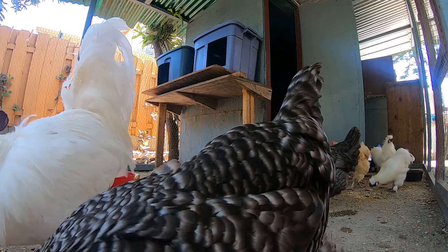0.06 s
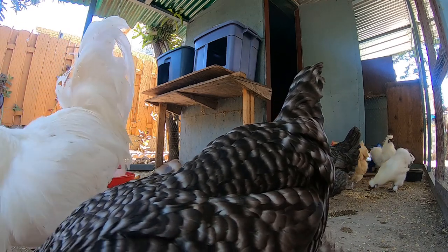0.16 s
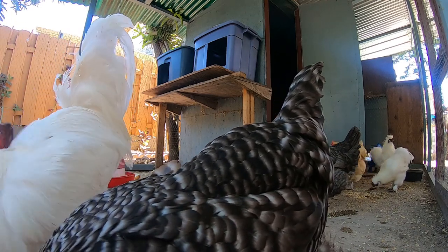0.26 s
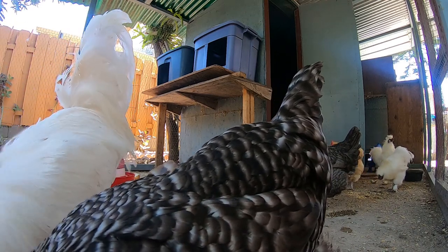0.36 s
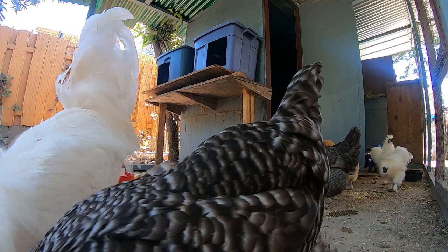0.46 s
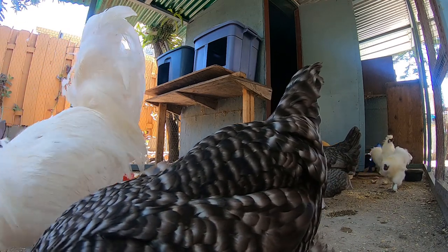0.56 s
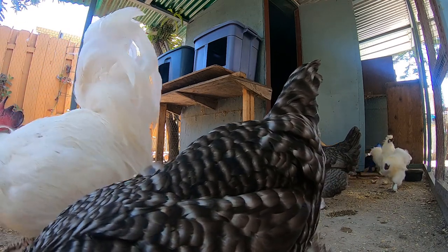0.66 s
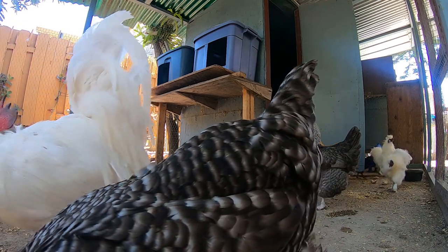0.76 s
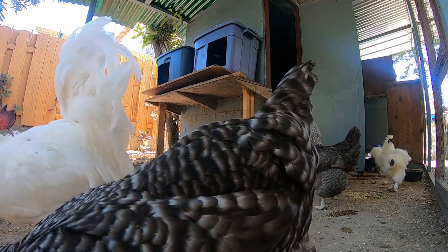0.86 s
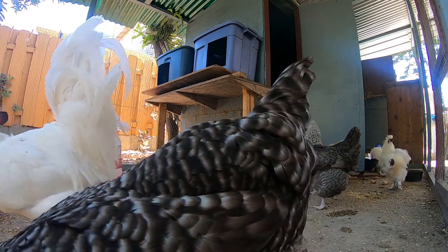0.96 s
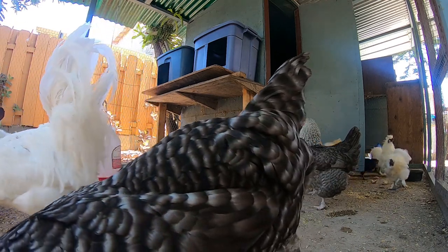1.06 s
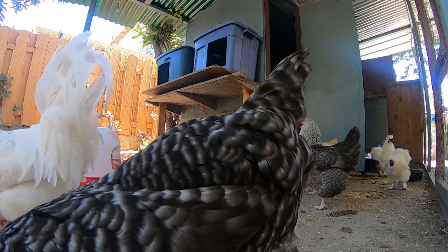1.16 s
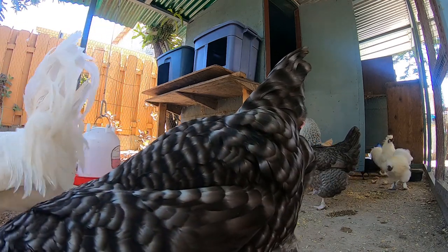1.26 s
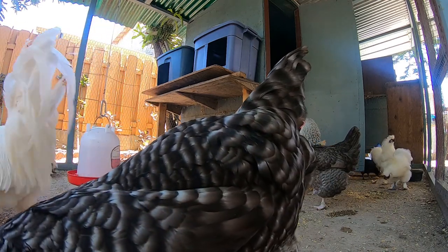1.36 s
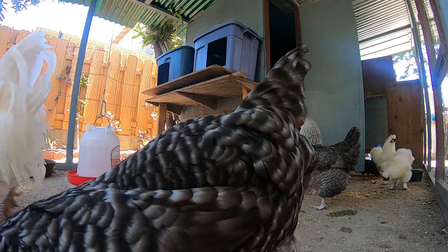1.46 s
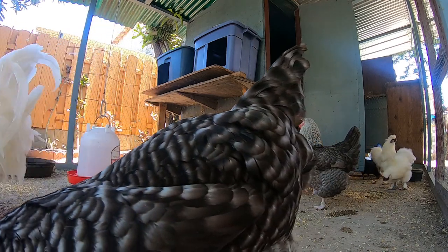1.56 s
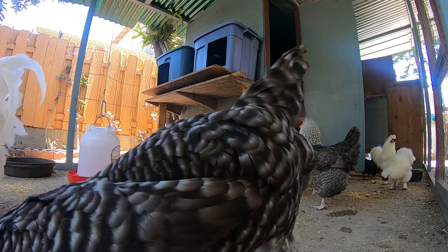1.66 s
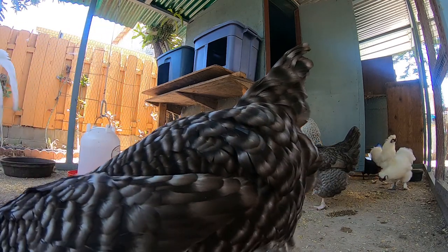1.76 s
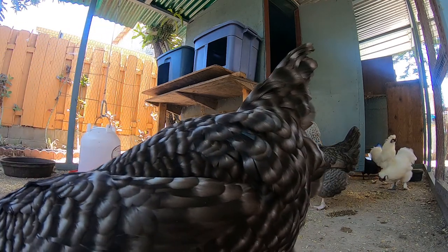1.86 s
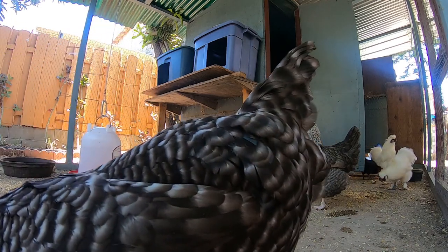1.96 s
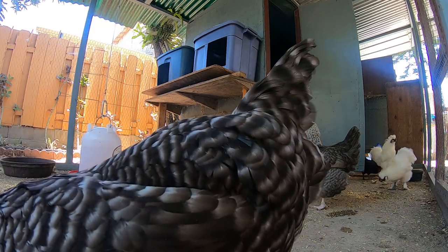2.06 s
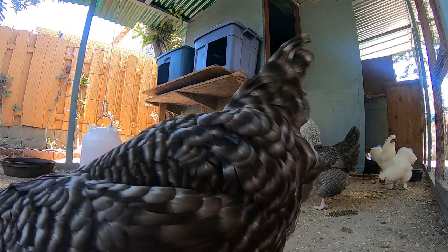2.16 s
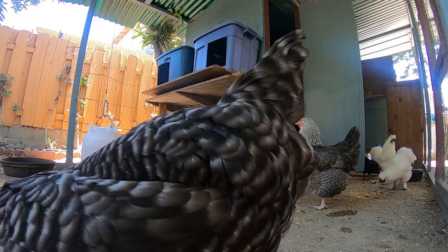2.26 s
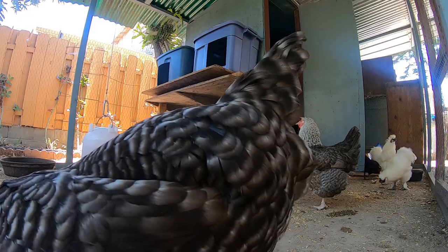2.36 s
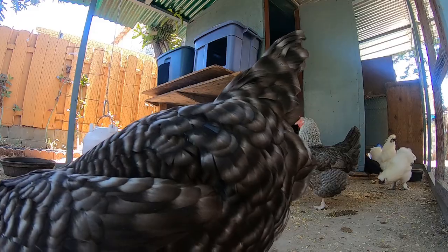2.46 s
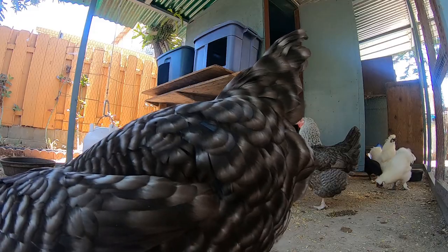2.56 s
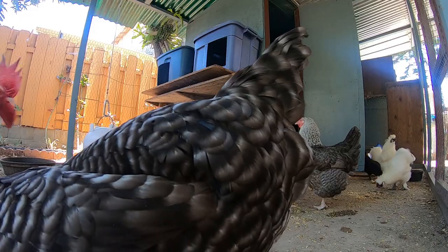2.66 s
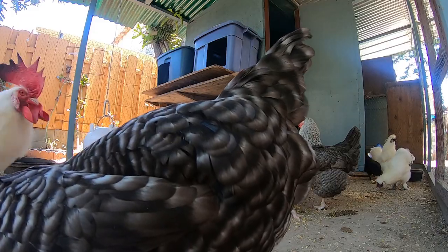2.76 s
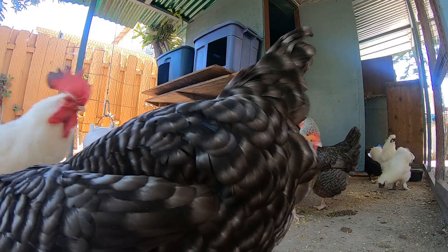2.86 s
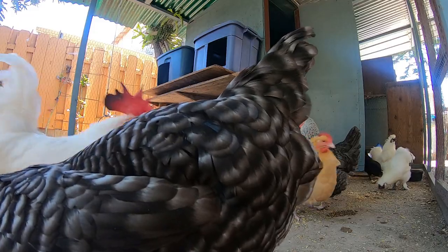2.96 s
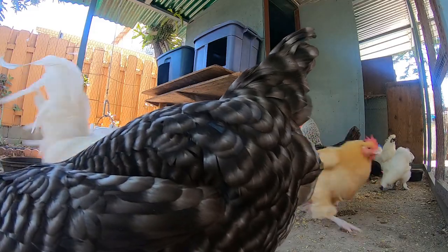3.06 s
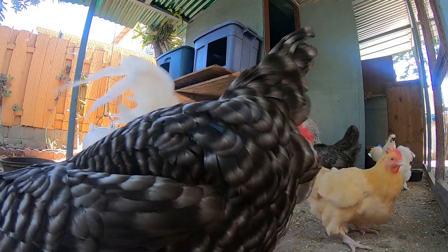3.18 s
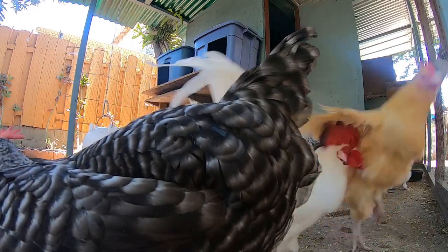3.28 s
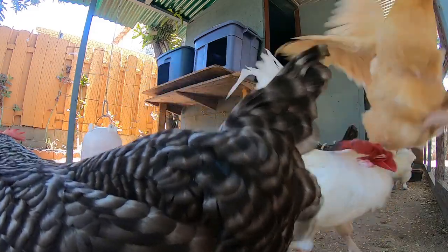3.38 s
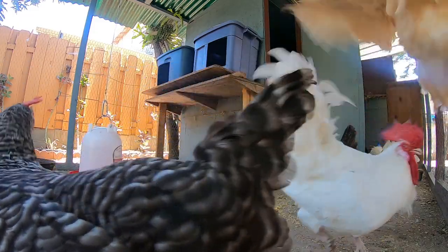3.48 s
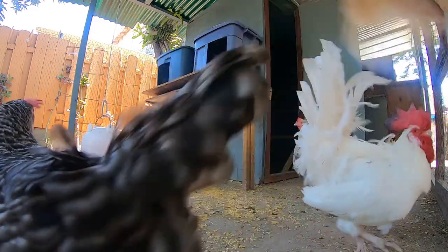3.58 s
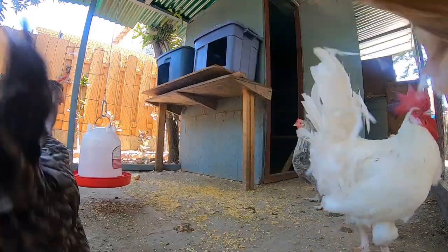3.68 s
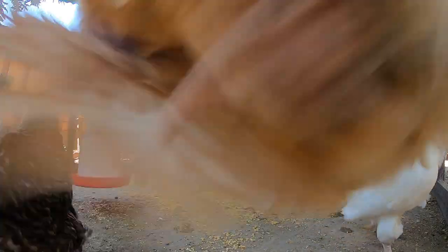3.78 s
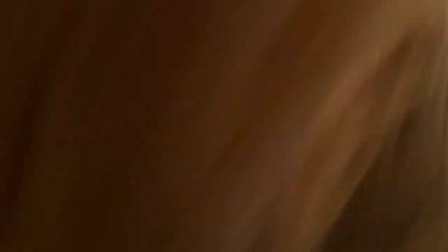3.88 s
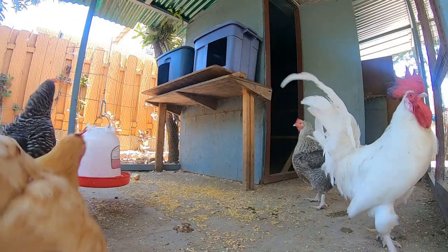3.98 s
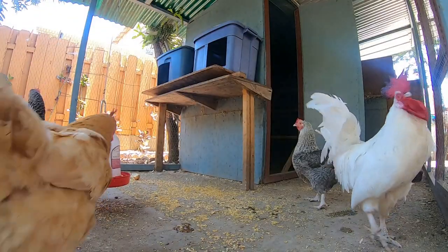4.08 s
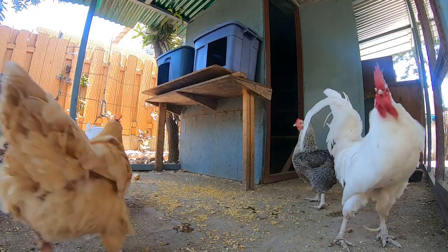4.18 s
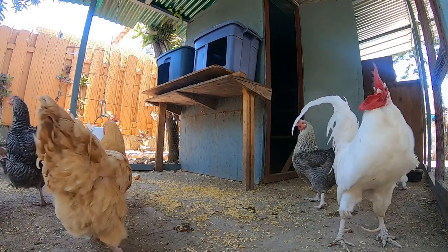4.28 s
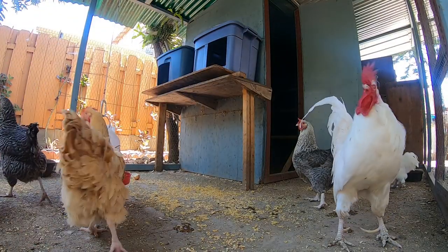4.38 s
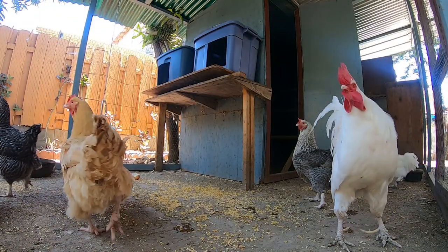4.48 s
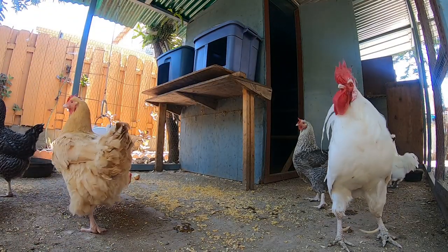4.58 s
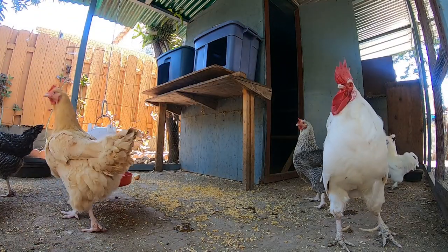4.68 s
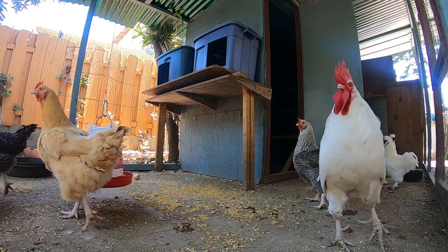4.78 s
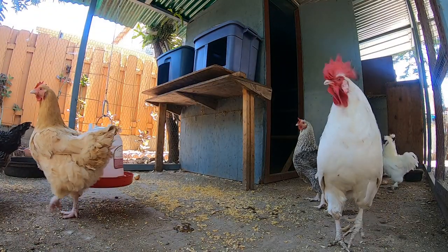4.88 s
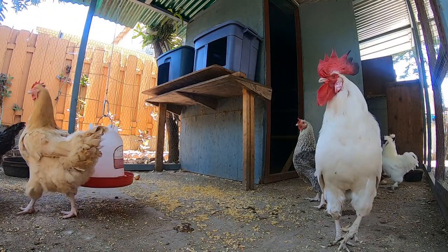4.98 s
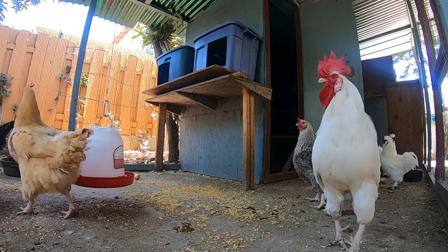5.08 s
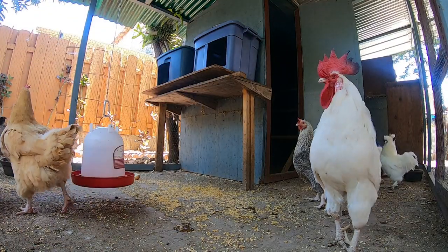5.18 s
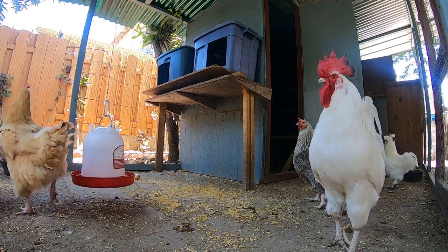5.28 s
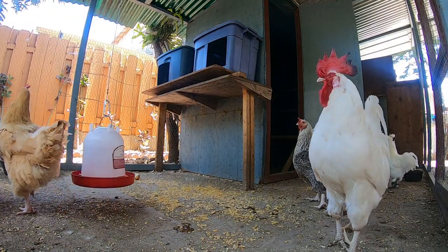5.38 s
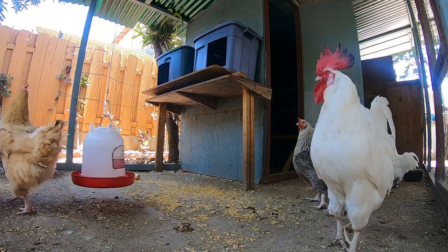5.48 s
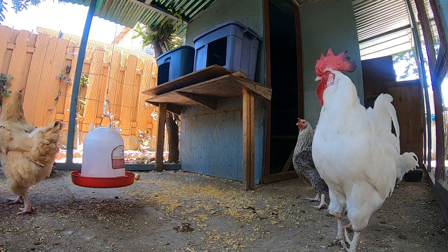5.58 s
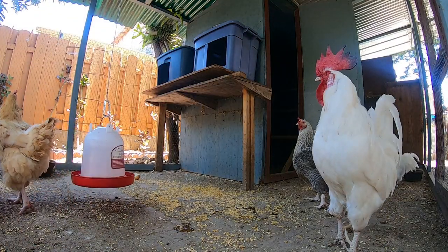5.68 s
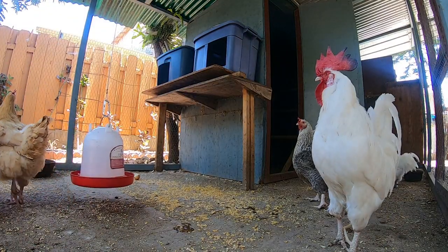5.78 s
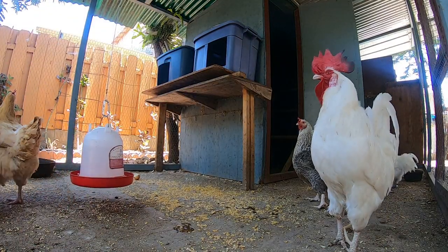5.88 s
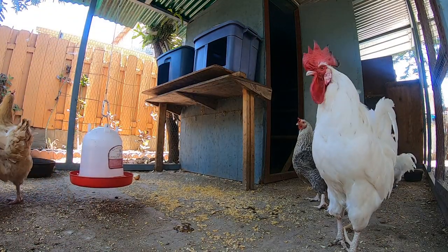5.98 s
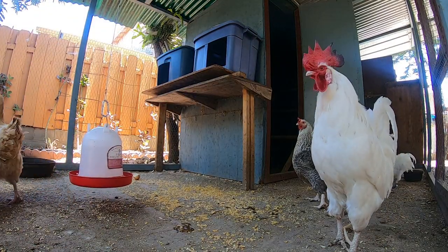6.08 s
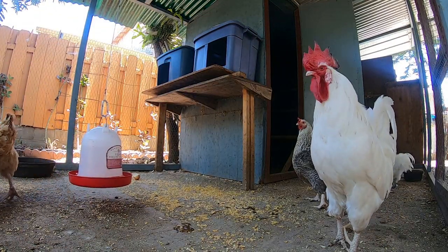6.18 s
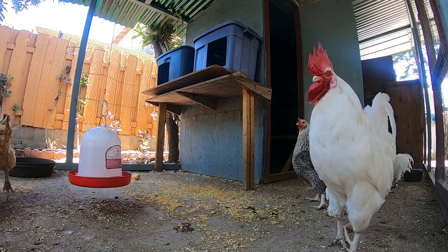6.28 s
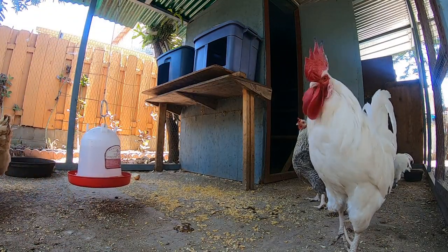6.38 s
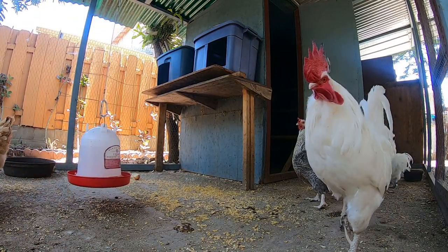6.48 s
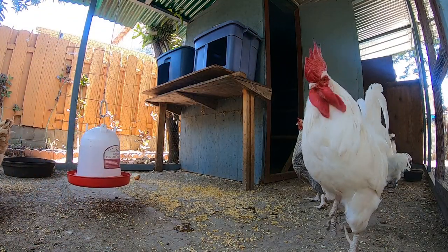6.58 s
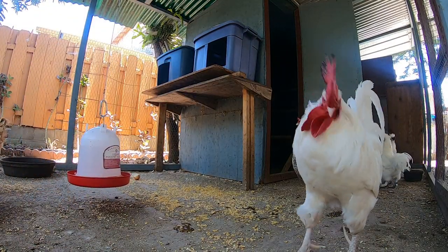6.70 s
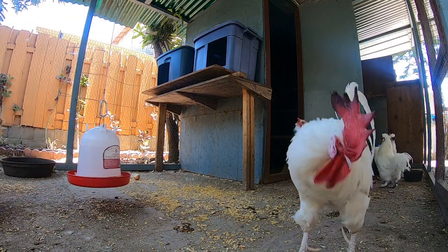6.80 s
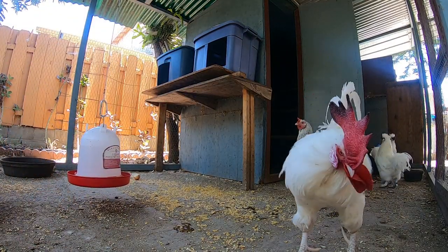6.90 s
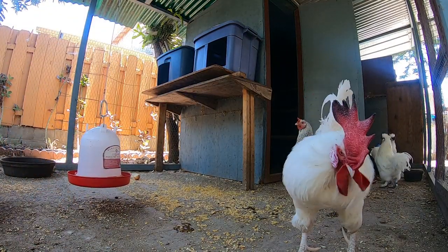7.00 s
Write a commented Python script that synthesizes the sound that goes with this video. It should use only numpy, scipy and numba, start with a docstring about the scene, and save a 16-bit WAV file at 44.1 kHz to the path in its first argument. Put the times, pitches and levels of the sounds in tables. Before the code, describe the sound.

Quiet pecking, feather rustles and a scrape on the microphone lead to frantic hen squawks, buffeting flaps, a falling whine and two hoarse rooster calls.

```python
"""Birds rustle, peck and peep in a roofed run, heard from a camera on the ground; one scuffs against it.
A chased hen yelps, squawks four times and flaps over the microphone, then clucks softly and whines, falling.
A rooster answers close by with two rising, rasping calls over a low outdoor rumble. Voices are pulses or
sines, most shaped by throat resonances; air, feathers and grit are filtered noise; struck things ring or click."""
import sys
import numpy as np
from scipy import signal
from scipy.fft import rfft, irfft, next_fast_len
from scipy.io import wavfile
from scipy.ndimage import uniform_filter1d
from numba import njit

SR = 44100
rng = np.random.default_rng(int(sys.argv[2]) if len(sys.argv) > 2 else 0)


def generate_wav(signal):
    """Clip the signal to [-1, 1] and save it as 16-bit WAV at the path in sys.argv[1]."""
    frames = np.transpose(np.atleast_2d(signal))
    scaled = np.clip(frames, -1, 1) * 32767
    pcm = np.round(scaled).astype(np.int16)
    wavfile.write(sys.argv[1], SR, pcm)


N = 310464
TIME = np.arange(N) / SR

# wing strokes that reach the microphone:
# (time [s], air push [dB], buffeting [dB], feather swish [dB], swish decay [s])
WING_STROKES = [(3.4, -19.5, -36, -20.5, 0.027), (3.528, -14.5, -32, -33.5, 0.082),
                (3.637, -4.5, -42, -29.5, 0.041), (3.755, -16, -8.5, -31.5, 0.002),
                (3.786, -11.5, -21, -64, .005), (3.873, -16, -28, -40, 0.013),
                (3.957, -26, -16.5, -46.5, 0.054), (3.997, -29, -9, -36, 0.0085)]


def undb(db):
    """Decibels to gain."""
    return 10 ** (np.asarray(db) / 20)


def unit(x):
    """Scale to rms 1."""
    return x / np.sqrt(np.mean(x ** 2) + 1e-18)


def even(x, size=900):
    """Hold the running rms near 1 over about size samples, so that a level curve sets the loudness."""
    power = uniform_filter1d(uniform_filter1d(x ** 2, size), size // 2)
    return x / np.sqrt(np.abs(power) + 1e-12)


def curves(rows, t):
    """Every column of a table at times t."""
    s, *columns = np.transpose(rows)
    return [np.interp(t, s, c) for c in columns]


def span(start, end):
    """Sample times from start to end."""
    return TIME[int(start * SR):int(end * SR)]


def hold(t, start, end, attack, release):
    """Envelope that has risen to 1 by start, holds until end and then falls to 0."""
    return np.clip(1 + np.minimum((t - start) / attack, (end - t) / release), 0, 1)


def flare(s, rise, decay):
    """Envelope that swells to 1 at time s and dies away."""
    return np.exp(-np.minimum(np.maximum((s - TIME) / rise, (TIME - s) / decay), 20))


def add(out, s, x, pan_db=0):
    """Mix a sound into the stereo track at time s; pan_db is left minus right, so negative is to the right."""
    i = max(int(s * SR), 0)
    sides = undb(np.array([[pan_db], [-pan_db]]) / 2)
    x = (x * sides / sides.mean())[:, :N - i]
    out[:, i:i + x.shape[1]] += x


def walk(n, rate):
    """Smooth random wander, spread near 1."""
    k = max(int(SR / rate), 2)
    steps = np.repeat(rng.standard_normal(n // k + 2), k)
    return 1.302 * uniform_filter1d(uniform_filter1d(steps, k), k)[:n]


def colour(x, points):
    """Filter by a spectrum of (frequency [Hz], level [dB]) points."""
    n = x.shape[-1]
    size = next_fast_len(n + 2048)
    hz, db = np.transpose(points)
    bins_hz = np.arange(size // 2 + 1) * SR / size
    gain = undb(np.interp(np.log(bins_hz + 1), np.log(hz), db))
    return irfft(rfft(x, size) * gain, size)[..., :n]


def pair(n, likeness):
    """Left and right noise with the given correlation; the centre has rms 1."""
    c = np.clip(likeness, 0, 1)
    mid, side = rng.standard_normal((2, n))
    return mid + np.sqrt((1 - c) / (1 + c)) * side * np.array([[1], [-1]])


def band(x, lo_hz, hi_hz):
    """Causal band-pass."""
    edges_hz = [lo_hz, min(hi_hz, .45 * SR)]
    return signal.sosfilt(signal.butter(2, edges_hz, "band", fs=SR, output="sos"), x)


@njit
def svf(x, hz, width):
    """Moving resonance, gain 1 at its centre."""
    y, b, l = np.empty(len(x)), 0., 0.
    for i in range(len(x)):
        g, k = np.tan(np.pi * hz[i] / SR), width / hz[i]
        v = (b + g * (x[i] - l)) / (1 + g * (g + k))
        b, l, y[i] = 2 * v - b, l + 2 * g * v, k * v
    return y


def steep(x, hz, width_hz):
    """A resonance applied twice; the width is that of one pass."""
    return svf(svf(x, hz, float(width_hz)), hz, float(width_hz))


def resonate(x, hz, width_hz):
    """A steep throat resonance at steady loudness."""
    return even(steep(x, hz, width_hz))


def roughness(rows, t, clear, turn_s):
    """Roughness of a voice that is fairly clear except in the given stretches."""
    return np.maximum(clear, sum(r * hold(t, start, end, turn_s, turn_s) for start, end, r in rows))


def syrinx(hz, rough, jitter, shimmer, air):
    """Voice membrane pulses: roughness scatters their spacing and size, and air hisses once a cycle."""
    n = len(hz)
    phase = 2 * np.pi * np.cumsum(hz * (1 + jitter * rough * walk(n, 500))) / SR
    pulses = unit(sum(np.cos(k * phase) * (k * hz < SR / 3) for k in np.arange(1, 40)))
    hiss = rng.standard_normal(n) * (1 + np.cos(phase))
    return pulses * (1 + shimmer * rough * walk(n, 400)) + air * (rough + 0.25) * hiss


def coop(x):
    """Short diffuse echo from the shed wall, fence and tin roof: decaying noise, shorter in the treble."""
    t60_s, treble_t60_s = 0.25, 0.2  # time to die away by 60 dB
    t = TIME[:SR // 2]
    noise = pair(len(t), 0.58) * np.clip((t - .004) / 0.0031, 0, 1)
    body = band(noise, 220, 5200) * undb(-60 * t / t60_s)
    treble = band(noise, 3200, 9700) * undb(-60 * t / treble_t60_s)
    tail = body + 0.16 * treble
    return signal.fftconvolve(x.mean(0)[None], tail / np.sqrt(np.sum(tail ** 2)), axes=1)[:, :N]


def ports(common_db):
    """Rocking moves the two microphone ports in opposite directions, plus a part common to both."""
    return undb(common_db) + np.array([[1], [-1]])


def outdoors():
    """A wavering low rumble and a smooth distant wash: louder early on, sunk for a while after the wing beats."""
    # tone of each noise: (frequency [Hz], relative level [dB])
    rumble_tone = [(20, -8.5), (45, -9), (72, 5), (110, -7), (165, 5), (220, -3.5), (290, -5.5), (400, -24),
                   (700, -69), (5000, -100)]
    wash_tone = [(200, -20.5), (400, 3), (700, 0), (1500, -4.5), (2200, -13.5), (3500, -16.5),
                 (4800, -20.5), (6000, -28.5), (8500, -26.5), (15000, -64.5)]
    early = np.clip(1 - (TIME - 1.7) / 0.42, 0, 1)  # fades out from 1.7 s, over 0.42 s
    dip = hold(TIME, 4.223, 4.6, attack=0.15, release=0.95)
    low, far = pair(N, .94), pair(N, .4)
    rumble_db = -42 + 4 * early - 13.5 * dip + 2.66 * walk(N, 10)
    wash_db = -52 + 4.5 * early - 7.5 * dip + 0.31 * walk(N, 6.4)
    return unit(colour(low, rumble_tone)) * undb(rumble_db) + unit(colour(far, wash_tone)) * undb(wash_db)


def shuffles(rise_s=0.012, decay_s=0.017):
    """Feet drag briefly over grit and spilled feed: short swells of grainy noise."""
    # soft shuffles: (time [s], level [dB])
    drags = [(4.262, -53.5), (4.932, -52.5), (4.972, -57), (5.078, -56), (5.185, -57), (5.56, -49.5),
             (6.797, -49)]
    # tone of feet on dirt: (frequency [Hz], relative level [dB])
    dirt_tone = [(400, -22), (1300, 2), (4500, 3.5), (6000, -15), (9000, -13.5), (15000, -45)]
    grit = unit(colour(pair(N, .5) * undb(4 * walk(N, 700)), dirt_tone))
    return grit * sum(undb(db) * flare(s, rise_s, decay_s) for s, db in drags)


def peeps(room_db=-5):
    """Nearly pure gliding notes, each a swelling sine: distant peeps, and the hen's rising yelp at 3.165 s."""
    # distant peeps, and at 3.165 s the chased hen's yelp close by:
    # (time [s], length [s], start pitch [Hz], middle pitch [Hz], end pitch [Hz], level [dB])
    notes = [(0.08, 0.09, 3570, 3080, 2360, -56), (1.904, 0.11, 2200, 2810, 2380, -49),
             (1.919, 0.099, 2920, 3310, 3220, -47), (2.186, 0.084, 4100, 2840, 2290, -52),
             (3.165, 0.027, 980, 1154, 1610, -26.5)]
    out = np.zeros((2, N))
    for s, length_s, start_hz, middle_hz, end_hz, db in notes:
        u = np.linspace(0, 1, int(length_s * SR))
        glide_hz = np.interp(u, [0, .5, 1], [start_hz, middle_hz, end_hz])
        hz = glide_hz * (1 + 0.014 * walk(len(u), 356))
        add(out, s, np.sin(2 * np.pi * np.cumsum(hz) / SR) * np.sin(np.pi * u) * undb(db))
    return out + undb(room_db) * coop(out)


def taps(decay_s=0.0032, thud_decay_s=0.0066, room_db=-8, pan_db=2):
    """Pecks, steps and, from 3.649 to 3.98 s, wing strikes: a thud, a clack and a tick, all bursts of noise."""
    # pecks, steps and wing strikes; a harder one has less thud and more tick:
    # (time [s], level [dB], hardness [dB])
    strikes = [(0.0907, -33, -4.5), (1.367, -29.5, -12.5), (2.4978, -51, 17), (2.6124, -46, 10),
               (2.6343, -38, -11), (2.678, -46, 11), (2.7177, -38, 3), (2.937, -34.5, -4.5),
               (3.177, -29, 10.5), (3.2935, -23, -2), (3.649, -16.5, 7), (3.755, -29, -14),
               (3.8625, -20, 11), (3.9797, -19.5, 13.5), (6.4644, -36, 0), (6.6507, -36.5, 0.5),
               (6.7866, -32, 1)]
    thud_db, tick_db = -8, -11.5  # against the clack, at hardness 0
    out, t = np.zeros((2, N)), TIME[:SR // 20]
    for s, db, hard_db in strikes:
        noise = pair(len(t), 0.8)
        thud = unit(band(noise, 350, 900)) * np.exp(-t / thud_decay_s) * undb(thud_db - hard_db)
        clack = unit(band(noise, 630, 2960 * 2 ** (hard_db / 20)))
        tick = unit(band(noise, 7300, 8400)) * undb(tick_db + hard_db)
        crack = (clack + tick) * np.exp(-t / decay_s)
        add(out, s, band(thud + crack, 200, 8800) * undb(db), pan_db)
    return out + undb(room_db) * coop(out)


def knock(room_db=-3, crack_db=-10, rattle_db=-17, rattle_decay_s=.02):
    """One hard peck rings the feeder, which rattles briefly and fills the run."""
    # the peck: (time [s], level [dB])
    peck_s, peck_db = (2.0738, -14.5)
    # ringing tones of the feeder: (frequency [Hz], relative level [dB], time to fall 60 dB [s])
    feeder = [(607, 4, 0.0039), (880, -15, 0.015), (1580, 2.5, 0.019), (1800, 1.5, 0.019),
              (2700, -12, 0.018), (3020, -3.5, 0.018), (3190, -1.5, 0.026), (3500, -8, 0.026),
              (4500, -18, 0.022), (4700, -31, 0.034), (6470, -11, 0.016), (7960, -8, 0.014)]
    out, t = np.zeros((2, N)), TIME[:SR // 6]
    ring = sum(undb(db - 60 * t / t60) * np.sin(2 * np.pi * hz * t) * rng.choice([-1, 1])
               for hz, db, t60 in feeder)
    noise = pair(len(t), 0.086)
    crack = band(band(noise, 570, 8000), 430, 7900) * np.exp(-t / 0.00085)
    rattle = unit(band(noise, 810, 3800)) * np.exp(-t / rattle_decay_s)
    hit = ring / np.abs(ring).max() + undb(crack_db) * crack + undb(rattle_db) * rattle
    add(out, peck_s, band(hit, 150, 9000) * undb(peck_db), pan_db=4)
    return out + undb(room_db) * coop(out)


def scuff(room_db=-13, grit_db=-21, grit_s=0.011):
    """A hen's foot sticks and slips on the camera: each slip rings the housing while the mount shudders."""
    # slips of the foot: (time [s], level [dB], brightness [dB per octave about 1 kHz])
    slips = [(1.676, -20, -3), (1.687, -19, 3.5), (1.705, -14.5, 0), (1.737, -15.5, -1.5),
             (1.764, -14.5, -1), (1.7747, -16.5, -3), (1.784, -11, 4.5), (1.7963, -13, 3), (1.808, -9, 3),
             (1.818, -13.5, 1)]
    # ringing tones of the camera's housing:
    # (frequency [Hz], relative level [dB], time to fall 60 dB [s], part common to both ports [dB])
    housing = [(224, -8.5, 0.056, -14), (418, -9.5, 0.049, -15), (910, -13, 0.022, -25),
               (1293, -3, 0.071, -16.5), (1540, -13, 0.029, -13), (1710, -27, 0.029, -7),
               (2710, -37, 0.042, 4), (4740, -37.5, 0.013, 2)]
    # tone of the scraping and of the shudder: (frequency [Hz], relative level [dB])
    scrape_tone = [(400, -31), (750, 0), (950, -28), (1300, -8), (1550, 0), (1800, -3), (2150, -13),
                   (2750, -9), (3700, -28), (8000, -17.5), (12000, -53)]
    shudder_tone = [(25, -25), (50, -8), (78, 7.5), (115, -11), (260, -11), (350, -21), (800, -32.5),
                    (5000, -100)]
    from_s, to_s, attack_s, decay_s, shudder_db = 1.684, 1.817, 0.035, 0.064, -26.5
    out, t = np.zeros((2, N)), TIME[:SR // 10]
    for s, db, bright_db in slips:
        ring = 0
        for hz, mode_db, t60, common_db in housing:
            fading = undb(mode_db + bright_db * np.log2(hz / 1000) - 60 * t / t60)
            tone = np.sin(2 * np.pi * hz * rng.normal(1, 0.03) * t)  # pitch differs a little each time
            ring = ring + fading * tone * ports(common_db)
        grit = band(unit(colour(pair(len(t), 0), scrape_tone)) * np.exp(-t / grit_s), 300, 7700)
        add(out, s, undb(db) * band(ring + undb(grit_db) * grit, 60, 7600))
    rise = np.clip(1 + (TIME - from_s) / attack_s, 0, 1)
    shaking = rise * np.exp(-np.maximum(TIME - to_s, 0) / decay_s)
    shudder = even(colour(pair(N, 0), shudder_tone), size=2400)
    add(out, 0, undb(shudder_db) * shaking * shudder, pan_db=-10.0)
    return out + undb(room_db) * coop(out)


def feathers(grain_db=3):
    """Barbs slide over each other: a fine grainy rustle that flares with each brush and wing beat."""
    # birds brush past each other: (time [s], level [dB], decay [s])
    brushes = [(0.021, -54, 0.15), (1.0, -54, 0.095), (1.13, -49.5, 0.035), (1.46, -57.5, 0.58),
               (2.64, -53, 0.1), (2.698, -53, 0.096), (2.866, -39.5, .015), (2.892, -36.5, 0.11),
               (3.221, -39.5, 0.34), (3.324, -41, 0.0091), (3.893, -38.5, 0.0064)]
    # tone of plumage: (frequency [Hz], relative level [dB])
    plumage_tone = [(500, -11.5), (1500, 0), (4000, 0.5), (8400, 3), (10000, -6.5), (15000, -28)]
    # a brush rises in 0.2 of its decay time
    power = sum((undb(db) * flare(s, 0.2 * decay_s, decay_s)) ** 2 for s, db, decay_s in brushes)
    for s, _, _, swish_db, decay_s in WING_STROKES:
        power = power + (undb(swish_db) * flare(s, 0.0085, decay_s)) ** 2
    grains = pair(N, 0.44) * undb(grain_db * walk(N, 1500) + 2.2 * walk(N, 90))
    hiss = unit(colour(grains, plumage_tone)) + undb(-18.5) * unit(band(grains, 560, 1900))
    return hiss * np.sqrt(power) * undb(np.array([[-.5], [1.5]]))  # a little louder on the right


def thumps(lo_hz=110, hi_hz=260):
    """The running hen's feet thump the ground beside the camera: swells of low noise."""
    # dull thumps: (time [s], level [dB])
    footfalls = [(3.223, -29), (3.302, -27), (3.362, -32), (3.393, -21.5)]
    swell = sum(undb(db) * flare(s, rise=0.0046, decay=0.031) for s, db in footfalls)
    return unit(band(pair(N, 0.96), lo_hz, hi_hz)) * swell


def slaps(rise_s=.0006, common_db=-10):
    """Wing feathers strike the camera and jolt it: very short bursts of noise."""
    # feather slaps: (time [s], level [dB], decay [s])
    strikes = [(3.745, -11, 0.0042), (3.7548, -1, 0.0032), (3.776, -19.5, 0.013), (3.957, -29, 0.0046),
               (3.98, -13.5, 0.0064), (3.991, -13, 0.0057)]
    # tone of a slap: (frequency [Hz], relative level [dB])
    slap_tone = [(60, 0.5), (200, 5), (600, -2), (1200, -5), (1700, -11), (2400, -20), (3500, -32),
                 (15000, -59)]
    bursts = sum(undb(db) * flare(s, rise_s, decay_s) for s, db, decay_s in strikes)
    return unit(colour(rng.standard_normal(N), slap_tone)) * bursts * ports(common_db)


def jolts(common_db=-3):
    """Wing bones knock the camera, and its mount answers with a hollow thud."""
    # knocks of the wing: (time [s], level [dB])
    knocks = [(3.757, -21), (3.788, -23), (3.987, -23), (3.999, -13)]
    # low ringing tones of the mount: (frequency [Hz], relative level [dB], time to fall 60 dB [s])
    mount = [(190, 0, .04), (349, -4, 0.05), (500, -2, 0.044)]
    out, t = np.zeros((2, N)), TIME[:SR // 10]
    for s, db in knocks:
        ring = sum(undb(d - 60 * t / t60) * np.sin(2 * np.pi * hz * rng.normal(1, .05) * t)
                   for hz, d, t60 in mount)
        add(out, s, undb(db) * ring * ports(common_db)[::rng.choice([-1, 1])])  # either way round
    return out


def wing_wind():
    """Each beat sucks, then pushes air at the microphone and leaves eddies that buffet it."""
    # tone of the buffeting: (frequency [Hz], relative level [dB])
    buffet_tone = [(15, -13), (40, 9), (150, 0.5), (300, -10.5), (600, -17.5), (1200, -35), (3000, -48),
                   (8000, -78)]
    first_width_s, halves_every_s = 0.0069, 0.36  # the push sharpens as the wing comes nearer
    buffet_s, eddy_lag_s, eddy_db = 0.0054, 0.022, -11.5  # a weaker eddy trails each beat
    push = np.zeros(N)
    # stirred air while she is overhead
    buffet = undb(-23.5) * hold(TIME, 3.637, 3.97, attack=0.37, release=0.19) ** 2
    for s, push_db, buffet_db, _, _ in WING_STROKES:
        width_s = first_width_s / 2 ** ((s - WING_STROKES[0][0]) / halves_every_s)
        u = np.clip((TIME - s) / width_s, -10, 10)
        push += undb(push_db) * u * np.exp((1 - u ** 2) / 2)
        for at, db in (s, buffet_db), (s + eddy_lag_s, buffet_db + eddy_db):
            buffet += undb(db) * np.exp(-np.minimum(((TIME - at) / buffet_s) ** 2 / 2, 20))
    return push + buffet * even(colour(pair(N, 0.44), buffet_tone), size=1600)


def rooster(room_db=-11, wall_decay_s=0.016):
    """Rising calls: voice pulses through a strong throat resonance, turning hoarse in stretches."""
    # the two calls: (time [s], throat level [dB], throat resonance [Hz])
    calls = [
        [(5.33, -67, 1020), (5.368, -47.5, 980), (5.49, -47.5, 1120), (5.532, -38, 1190), (5.632, -33.5, 1100),
         (5.882, -27, 1300), (5.95, -27, 1380), (6.038, -20, 1091), (6.085, -33, 1230)],
        [(6.24, -54, 1240), (6.246, -26, 1230), (6.256, -24.5, 1226), (6.276, -34, 1260), (6.314, -27.5, 1410),
         (6.408, -29.5, 1380), (6.45, -39, 1340)],
    ]
    # their rising pitch: (time [s], pitch [Hz])
    pitches = [
        [(5.35, 241.3), (5.406, 243.6), (5.5, 306.6), (5.642, 302.7), (5.682, 335.8), (5.732, 338.7),
         (5.768, 317), (5.826, 319.3), (6.07, 397.8)],
        [(6.25, 300.5), (6.276, 319.4), (6.41, 358.8), (6.44, 354)],
    ]
    # hoarse stretches: (start [s], end [s], roughness [0-1])
    hoarse = [(5.43, 5.58, .2), (5.63, 5.74, .9), (5.86, 5.92, .4), (5.94, 6.01, .13), (6.035, 6.08, .27),
              (6.24, 6.255, .2), (6.4, 6.42, .33)]
    # levels at the pitch and an octave up: (time [s], pitch level [dB], octave level [dB])
    chest_levels = [(5.33, -55, -54), (5.43, -44, -45.5), (5.49, -35.5, -35.5), (5.59, -33.5, -36),
                    (5.65, -36, -38.5), (5.82, -33.5, -42), (5.93, -28.5, -28), (5.965, -27.5, -38),
                    (6.003, -38, -31), (6.04, -29, -31), (6.085, -46, -40.5), (6.24, -48, -46),
                    (6.265, -30, -30.5), (6.315, -35.5, -33.5), (6.345, -39, -47), (6.37, -34, -27.5),
                    (6.408, -32, -28), (6.45, -53, -41)]
    # level of the high rasp: (time [s], level [dB])
    rasp_levels = [(5.47, -69), (5.57, -52.5), (5.69, -56.5), (5.82, -49.5), (5.93, -39), (5.97, -41),
                   (6.04, -35.5), (6.085, -48), (6.24, -51.5), (6.3, -46), (6.35, -42), (6.408, -39.5),
                   (6.45, -50)]
    # tone of the rasp: (frequency [Hz], relative level [dB])
    rasp_tone = [(1600, -28), (2100, 8), (2700, 7.5), (3150, 8.5), (3700, 3.5), (4600, -13), (5800, -12.5),
                 (6800, -31), (8000, -19.5), (11000, -48)]
    throat_tone = [(300, -19.5), (1000, -0.5), (1700, 1.5), (2100, -8.5)]  # (frequency [Hz], level [dB])
    out = np.zeros((2, N))
    early = TIME[:SR // 25]
    wall = rng.standard_normal(len(early)) * np.exp(-early / wall_decay_s)
    for rows, pitch in zip(calls, pitches):
        t = span(rows[0][0], rows[-1][0])
        n = len(t)
        db, throat_hz = curves(rows, t)
        hz, = curves(pitch, t)
        rough = roughness(hoarse, t, clear=.065, turn_s=.022)
        source = syrinx(hz, rough, jitter=.16, shimmer=1.2, air=.22)
        throat = undb(db) * resonate(colour(source, throat_tone), throat_hz, width_hz=315)
        root_db, octave_db = curves(chest_levels, t)
        root = undb(root_db) * resonate(source, hz, width_hz=143)
        octave = undb(octave_db) * resonate(source, 2 * hz, width_hz=180)
        # near surfaces lift or cancel each high harmonic as it glides
        reflected = unit(signal.fftconvolve(source, wall)[:n])
        air = undb(-4) * unit(rng.standard_normal(n) * uniform_filter1d(np.abs(source), size=40))
        rasp_db, = curves(rasp_levels, t)
        rasp = even(colour(unit(source) + reflected + air, rasp_tone))
        rasp = rasp * undb(rasp_db + 2 * walk(n, 100.4))
        fade = np.clip((t - t[0]) / 0.014, 0, 1) * np.clip((t[-1] - t) / 0.018, 0, 1)
        add(out, t[0], (throat + root + octave + rasp) * fade)
    return out + undb(room_db) * coop(out)


def whine(second_hz=505, flutter_hz=58, room_db=-20, second_follows=0.695):
    """A clean falling note gains a half-pitch tone; the other side of the syrinx joins and the two flutter."""
    # the hen's whine: (time [s], pitch before the last droop [Hz], level [dB])
    note = [(4.191, 1008, -54), (4.217, 986, -33), (4.294, 855.5, -28), (4.661, 870.5, -26.5),
            (4.75, 788, -30.5), (4.785, 858.5, -26), (4.818, 747, -28.5), (4.828, 672, -28),
            (4.861, 640, -43)]
    # its overtones: (multiple of the pitch, level before the flutter weakens it [dB])
    overtone_levels = [(2, -25), (2.5, -26), (3, -31), (3.5, -30), (4, -41), (4.5, -37), (5, -37),
                       (5.5, -37), (6, -41)]
    # tone of the breath: (frequency [Hz], relative level [dB])
    breath_tone = [(100, -15.0), (700, 14.0), (1300, 5), (2400, -8.5),
                   (3600, -4), (4800, -9.5), (7000, -46), (13000, -56.0)]
    half_from_s, split_from_s, step_s = 4.295, 4.433, 0.014
    t = span(note[0][0], note[-1][0])
    n = len(t)
    hz, db = curves(note, t)
    hz = hz / 2 ** (22.7 * np.maximum(t - 4.83, 0))  # collapses by 22.7 octaves per s as the note ends
    halving = hold(t, half_from_s, t[-1], step_s, step_s)
    # near the end the voices lock for a moment: the second nearly goes and the half pitch is louder
    lock = hold(t, 4.785, 4.8, step_s, step_s)
    split = hold(t, split_from_s, t[-1], step_s, step_s) * (1 - 0.98 * lock)
    split_s = np.maximum(t - split_from_s, 0)
    half_gain = halving * undb(-15 + 12.5 * lock)
    second_gain = split * undb(-12 + 33.5 * split_s)
    flutter = 0.063 + split * (0.16 + 1.0 * split_s)
    beat = 2 * np.pi * np.cumsum(flutter_hz * (1 + 0.16 * walk(n, 49.6))) / SR
    phase = 2 * np.pi * np.cumsum(hz * (1 + .004 * walk(n, 250))) / SR
    phase = phase + 1.1 * flutter * walk(n, 230)
    main = np.sin(phase) * (1 + 0.98 * flutter * np.sin(beat))
    half = half_gain * np.sin(phase / 2)
    # the second voice follows the first one's pitch only in part
    other_hz = second_hz * (hz / np.median(hz)) ** second_follows * (1 + 0.109 * walk(n, 220))
    second = second_gain * np.sin(2 * np.pi * np.cumsum(other_hz) / SR) * (1 + .5 * np.cos(beat))
    overtones = 0
    for k, d in overtone_levels:
        present = halving if 2 * k % 2 else 1  # in-between overtones come with the half pitch
        overtones = overtones + undb(d) * present * np.sin(k * phase + (.3 + 2 * flutter) * walk(n, 200))
    overtones = overtones * undb(-14 * np.sqrt(flutter))
    breath = unit(colour(rng.standard_normal(n), breath_tone))
    air = undb(-25.0 + 7.9 * flutter) * (1 + .15 * np.cos(beat)) * breath
    voice = even(main + half + second + overtones + air, size=2000)
    out = np.zeros((2, N))
    add(out, t[0], voice * undb(db) * hold(t, t[0], t[-1] - step_s, step_s, step_s))
    return out + undb(room_db) * coop(out)


def squawks(beak_width_hz=560, edge_s=0.0017):
    """Short cries of voice pulses through throat and beak that tear and turn harsh; the hen comes nearer."""
    # the chased hen's cries, ending in a last soft cluck:
    # (time [s], pitch [Hz], level [dB], beak resonance [Hz])
    cries = [
        [(3.22, 853, -33, 1650), (3.225, 692, -21, 1380), (3.231, 590, -27, 1180), (3.24, 623, -16.5, 1020),
         (3.249, 556, -27, 1130)],
        [(3.31, 417, -27, 1900), (3.315, 440, -17, 1780), (3.326, 444, -16.5, 1780), (3.334, 478, -14.5, 1393),
         (3.347, 421, -20, 1390), (3.358, 412, -28, 1320)],
        [(3.414, 732, -18, 730), (3.429, 725.4, -15, 764), (3.435, 587, -13.5, 1790), (3.452, 604, -12, 1810),
         (3.459, 718, -13.5, 1430), (3.468, 600, -15, 1390), (3.473, 703, -11, 1340), (3.486, 590, -16, 1120),
         (3.495, 546, -26, 1080)],
        [(3.557, 863, -35.5, 860), (3.572, 700, -16.5, 700), (3.578, 604.3, -12.5, 1200),
         (3.59, 544, -14, 1430), (3.604, 620, -14.5, 1300)],
        [(3.882, 558, -40, 518), (3.889, 526, -26.5, 520), (3.903, 630, -32.5, 850), (3.916, 467, -26, 458),
         (3.926, 490, -43, 470)],
    ]
    # resonances of her throat: (frequency [Hz], width of one pass [Hz], relative level [dB])
    throat_tones = [(620, 360, -2.5), (1244, 500, -0.5), (1740, 390, -2.5), (2344, 470, 0.5),
                    (3063, 420, -5.5), (3730, 470, -8), (6550, 2200, -18.5)]
    # stretches where her voice tears: (start [s], end [s], roughness [0-1])
    tears = [(3.229, 3.245, .4), (3.329, 3.358, .6), (3.456, 3.466, .65), (3.587, 3.604, .75)]
    # she runs in from the right: left minus right and echo at the first squawk, and change per second
    pan_db, pan_db_per_s, room_db, room_db_per_s = -12, 21, -6.5, -21
    out, echo = np.zeros((2, 2, N))
    for rows in cries:
        t = span(rows[0][0], rows[-1][0])
        hz, db, beak_hz = curves(rows, t)
        rough = roughness(tears, t, clear=.1, turn_s=.003)
        source = syrinx(hz, rough, jitter=.14, shimmer=.8, air=.5)
        throat = sum(undb(d) * steep(source, np.full(len(t), float(f)), width) for f, width, d in throat_tones)
        # the wider the beak, the higher its resonance and the harsher the cry: 12.5 dB per octave
        harsh = undb(12.5 * np.log2(beak_hz / 1500))
        cry = even(resonate(source, beak_hz, beak_width_hz) + harsh * even(throat), size=300)
        cry = cry * undb(db) * hold(t, t[0] + edge_s, t[-1] - edge_s, edge_s, edge_s)
        running_s = t[0] - cries[0][0][0]
        add(out, t[0], cry, pan_db + pan_db_per_s * running_s)
        add(echo, t[0], cry * undb(room_db + room_db_per_s * running_s))
    return out + coop(echo)


def scene():
    """All the birds and the yard around them."""
    background = outdoors() + shuffles() + peeps() + taps() + knock() + scuff() + feathers()
    running_and_flapping = thumps() + slaps() + jolts() + wing_wind()
    return background + running_and_flapping + rooster() + whine() + squawks()


def record(dry):
    """The stereo image closes to the centre after the wing beats, the largest peaks clip and the top is cut."""
    # stereo width: (time [s], width [0-1])
    width_curve = [(4.05, 1), (4.2, 0)]
    width, = curves(width_curve, TIME)
    mid = dry.mean(0)
    sound = np.clip(mid + width * (dry - mid), -1, 1)
    return signal.sosfilt(signal.ellip(8, .2, 80, 15700, fs=SR, output="sos"), sound)  # cut above 15700 Hz


dry = scene()
out = record(dry)
generate_wav(out)
```